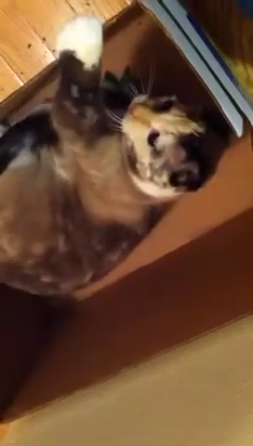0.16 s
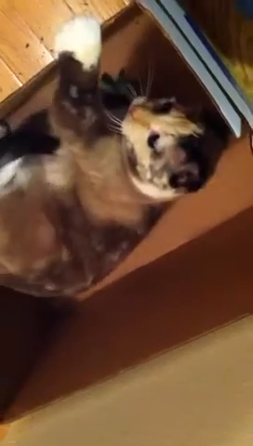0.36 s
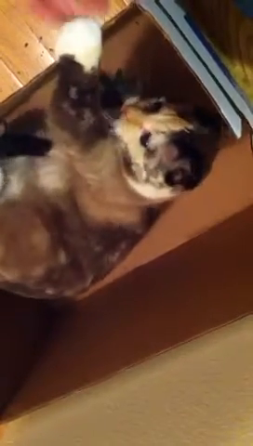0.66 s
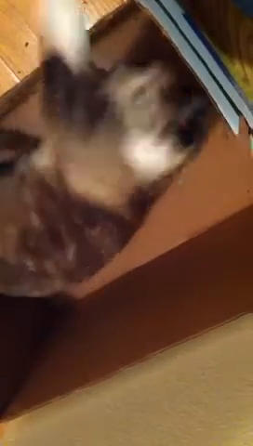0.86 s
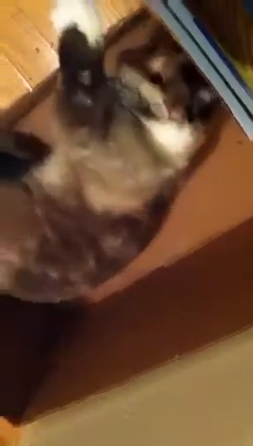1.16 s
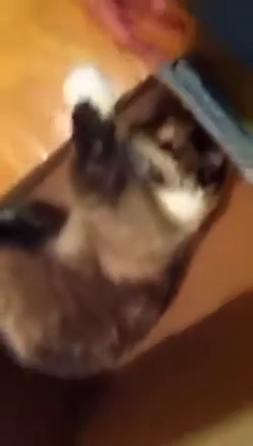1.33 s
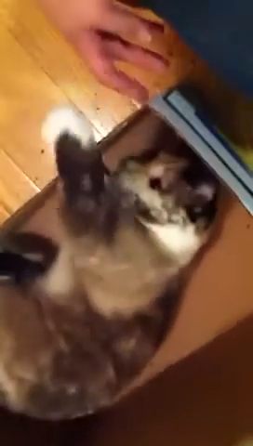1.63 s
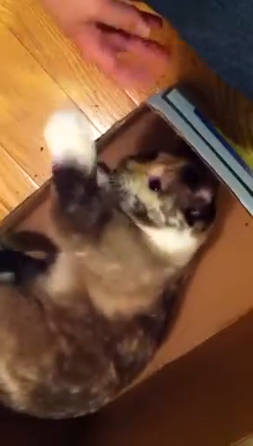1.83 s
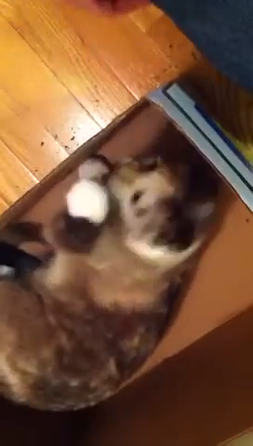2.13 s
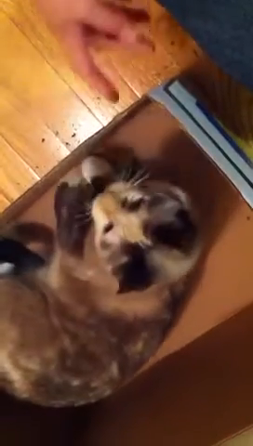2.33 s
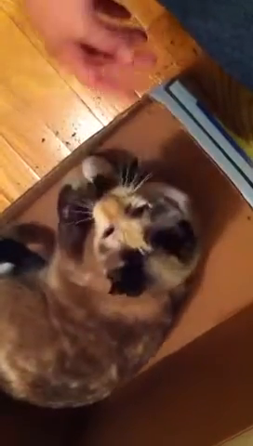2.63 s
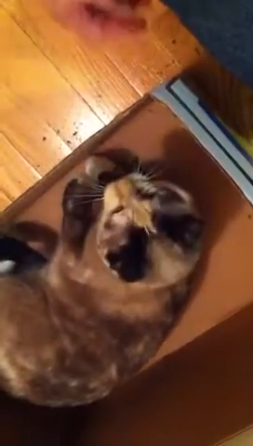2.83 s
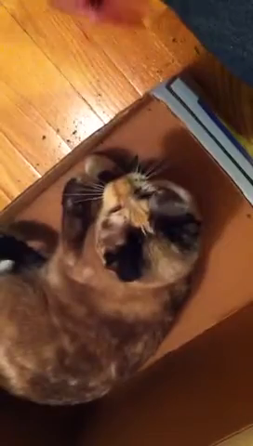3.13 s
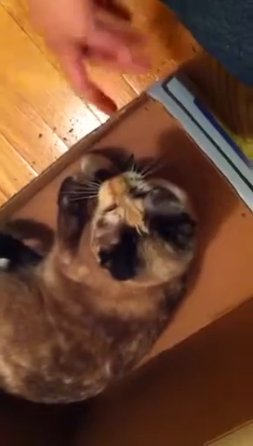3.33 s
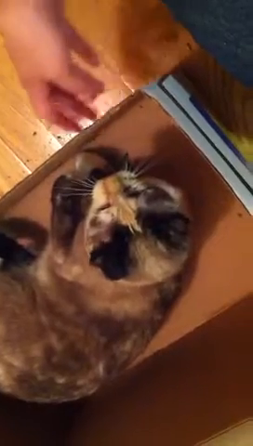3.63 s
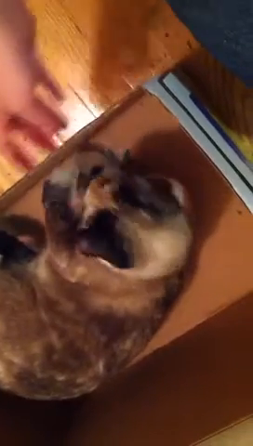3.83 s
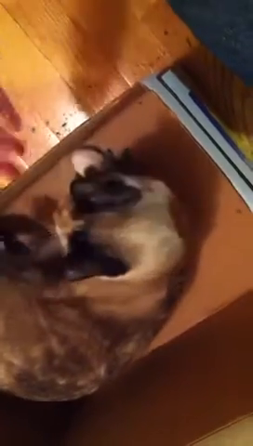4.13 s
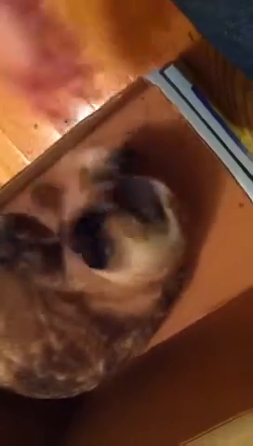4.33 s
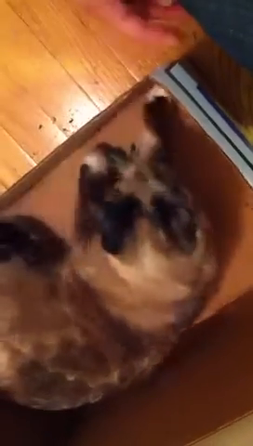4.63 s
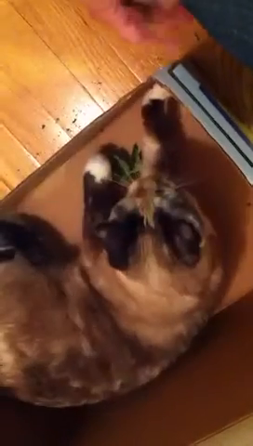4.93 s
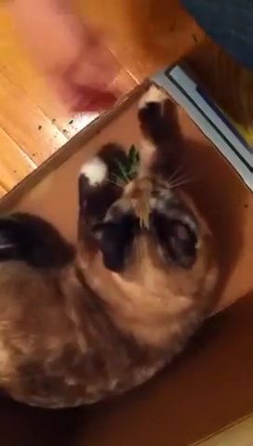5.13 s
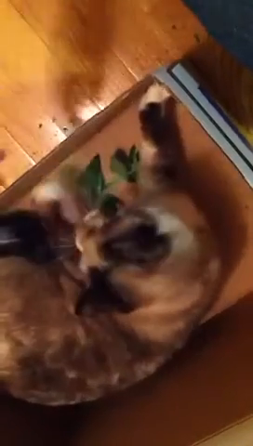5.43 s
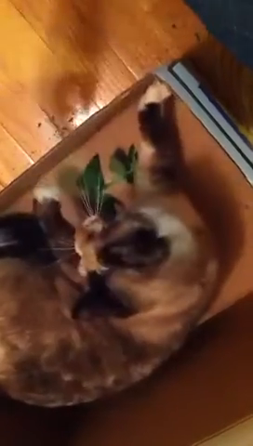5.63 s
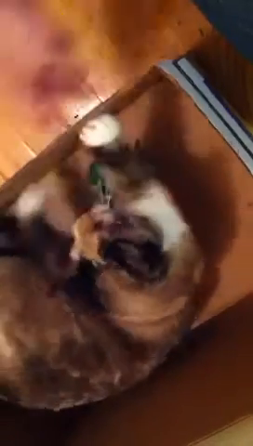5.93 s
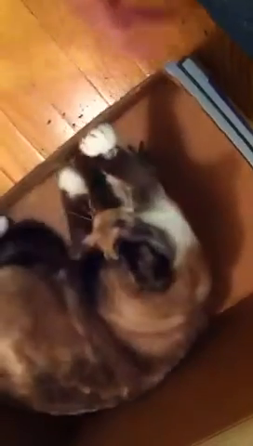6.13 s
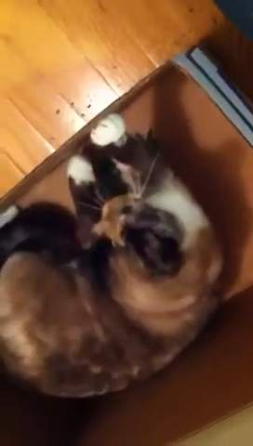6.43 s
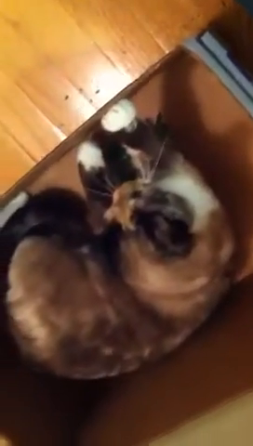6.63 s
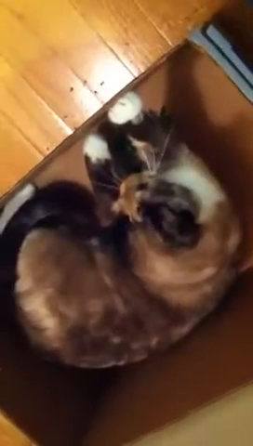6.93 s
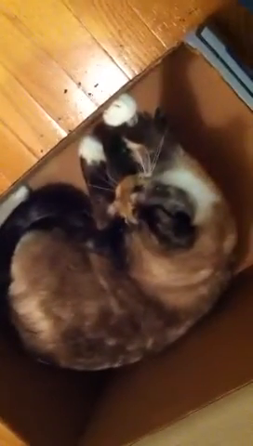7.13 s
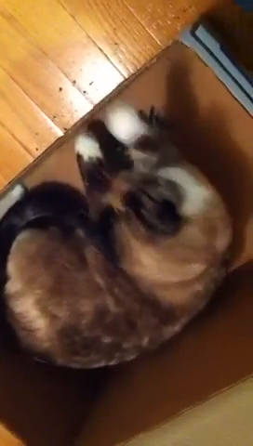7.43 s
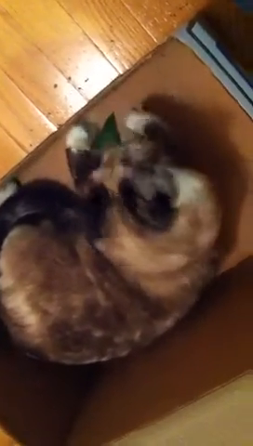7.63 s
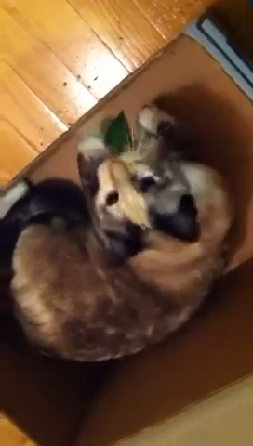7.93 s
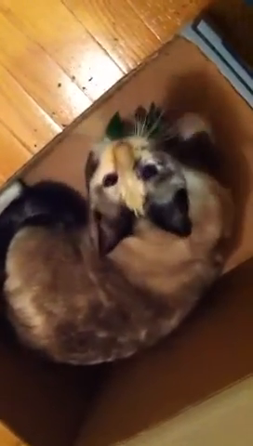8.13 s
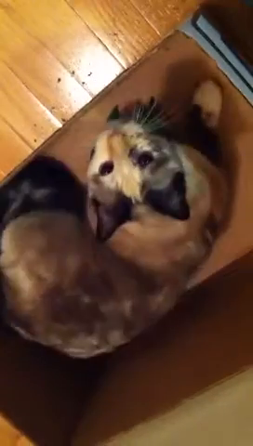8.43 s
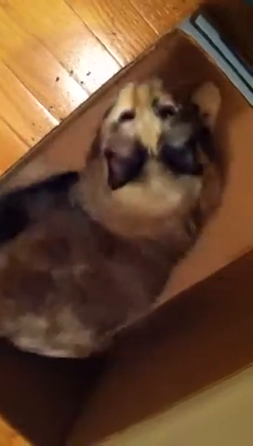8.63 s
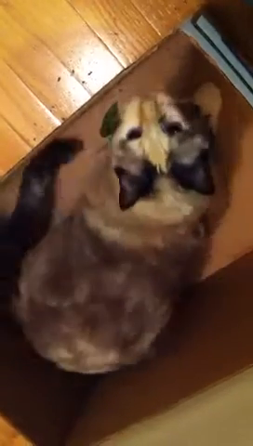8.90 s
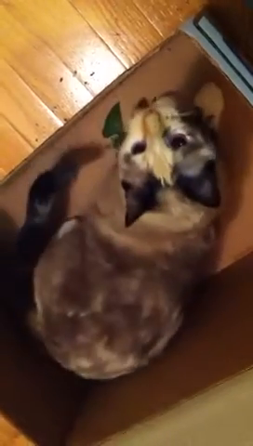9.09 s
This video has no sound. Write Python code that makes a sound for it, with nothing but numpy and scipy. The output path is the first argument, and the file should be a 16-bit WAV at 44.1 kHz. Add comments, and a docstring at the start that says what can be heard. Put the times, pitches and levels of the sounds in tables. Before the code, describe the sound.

Close cardboard knocks, short claw scrapes and soft body rubs come in bursts, busiest around four and six seconds, then fade into faint room murmur.

```python
"""First the low murmur and hiss of a quiet room; then a cat rolls about in an open cardboard box close by.
The box stands on a wooden floor. Paws and claws knock on its walls and skid a little: short pushes with a rattle.
Fur, claws and the sliding box rasp on the card: dense uneven slips that swell and fade; the card snaps a few times.
Knocks and rubs ring one box: a deep floor mode, the walls, the flaps and the stiff corrugated skin.
A faint echo of the room follows, heard through a microphone with a steep top cut."""
import sys
import numpy as np
from scipy import signal
from scipy.fft import rfft, irfft, next_fast_len
from scipy.io import wavfile

SR = 44100
rng = np.random.default_rng(int(sys.argv[2]) if len(sys.argv) > 2 else 0)


def dump(signal):
    """Clip the signal to [-1, 1] and save it as 16-bit WAV at the path in sys.argv[1]."""
    limited = np.clip(np.atleast_2d(signal).T, -1, 1)
    pcm = np.round(limited * 32767).astype(np.int16)
    wavfile.write(sys.argv[1], SR, pcm)


def voltage_ratio(level):
    """Linear amplitude factor for a level in decibels (scalar or array-like)."""
    return 10 ** (np.asarray(level, float) / 20)


N = 408366   # length in samples


def rms_one(x):
    """Scale to unit rms."""
    return x / np.sqrt(np.mean(x ** 2) + 1e-20)


def drift(rate_hz):
    """Slow chance of unit rms: noise twice through a one-pole low-pass, made at a twentieth of the rate."""
    r = np.exp(-40 * np.pi * rate_hz / SR)
    noise = rng.standard_normal(N // 20 + 2002)
    slow = signal.lfilter([1], [1, -2 * r, r * r], noise)[2000:]   # skip the filter's start
    return np.interp(np.arange(N) / 20, np.arange(len(slow)), rms_one(slow))


def coloured(x, spectrum):
    """Shape a signal by a (hz, level_db) spectrum; white noise of rms 1 keeps rms 1."""
    hz, level_db = np.transpose(spectrum)
    bins_hz = np.arange(1, N // 2 + 2) * SR / N
    gain = voltage_ratio(np.interp(np.log(bins_hz), np.log(hz), level_db, left=-90, right=-90))
    return irfft(rfft(x) * gain / np.sqrt(np.mean(gain ** 2)), N)


# air of the quiet room, spectrum shape: hz, level_db (per Hz, relative)
ROOM_TONE_SPECTRUM = [(40, -38), (70, -25), (100, -19.5), (150, -2.5), (200, -5), (310, -13), (480, -13.5),
                      (700, -20.5), (1200, -24), (3200, -24.5), (5000, -33), (6500, -31.5), (10000, -41.5),
                      (14000, -50), (15500, -62)]
ROOM_TONE_DB = -62.5   # rms around which the level drifts
WHINE_HZ, WHINE_RMS_DB = 14998, -94


def room_tone():
    """A low murmur of air with hiss on top, drifting slightly in level, and a very faint high sine whine."""
    air = coloured(rng.standard_normal(N), ROOM_TONE_SPECTRUM) * voltage_ratio(ROOM_TONE_DB + 1.2 * drift(2.1))
    whine = np.sqrt(2) * np.sin(2 * np.pi * WHINE_HZ * np.arange(N) / SR)
    return air + voltage_ratio(WHINE_RMS_DB) * whine


FLAPS_OVER_DB, FLAPS_SHARE = 0.5, 0.66   # flaps over a blend of skin (this share) and walls
FUR_UNDER_DB = -15   # fur hiss relative to the skin


def spread_over(skin_db, walls_db, extra_db, tilt_db=0):
    """Gains of skin, flaps, walls and fur for one rubbing contact, and its brightness weighted by the skin gain."""
    flaps_db = FLAPS_OVER_DB + extra_db + FLAPS_SHARE * skin_db + (1 - FLAPS_SHARE) * walls_db
    gains = voltage_ratio(np.array([skin_db, flaps_db, walls_db, skin_db + FUR_UNDER_DB]))
    return np.append(gains, voltage_ratio(skin_db) * tilt_db)[:, None]


CREST_DB = 9   # peak over rms of a short contact
RISE_SHARE = 0.4   # part of a short contact's length in which its pressure rises


def short_contacts(contacts):
    """Gains in time of short contacts: the pressure swells, holds and lets go."""
    out, t = np.zeros((5, N)), np.arange(SR // 2) / SR
    for start_s, gains, length_s in contacts:
        at = round(start_s * SR)
        rise = np.sin(np.pi / 2 * np.clip(t / (RISE_SHARE * length_s), 0, 1)) ** 2
        swell = rise * np.exp(-(t / length_s) ** 4)
        out[:, at:at + len(t)] += (voltage_ratio(-CREST_DB) * gains * swell)[:, :N - at]
    return out


# short scrapes of a paw on the card, drive levels relative within each part:
# start_s, skin_db, walls_db, length_s, extra_db (on the flaps), tilt_db (brightness, dB per octave)
PAW_SCUFFS = [(0.592, -44, -45, 0.028, 5, -3.5), (0.618, -48, -41.5, 0.035, 4, 4),
              (0.806, -55.5, -39.5, 0.057, 5.5, 4), (0.894, -58, -43, 0.093, 8.5, -9),
              (1.112, -59, -51.5, 0.093, 4, -1), (1.579, -36, -44.5, 0.052, 1, 0.5),
              (1.755, -50.5, -48.5, 0.093, -1, 2), (1.844, -46, -24.5, 0.016, 0, -9),
              (1.997, -45.5, -37, 0.064, 1.5, -4.5), (2.416, -39.5, -55, 0.027, 9.5, -4),
              (2.455, -38, -46, 0.024, 0, -2), (2.465, -61, -54, 0.04, 5, -2),
              (2.556, -38, -38, 0.059, 2, -2.5), (2.622, -62, -55, 0.093, 3, -6),
              (3.383, -47, -36.5, 0.033, 8.5, -3), (3.434, -45, -36, 0.04, 0.5, -3),
              (3.66, -47, -35, 0.027, -4, 3), (3.74, -45, -26.5, 0.02, -12, -4),
              (3.762, -41, -45, 0.017, 1, -7), (3.793, -55, -32, 0.017, -3, -13),
              (3.877, -39.5, -54, 0.05, 3, 7), (3.919, -40, -26.5, 0.038, -1, -3),
              (3.965, -51, -33, 0.029, -4, -10), (4.077, -42, -36, 0.02, -1.5, 0),
              (4.128, -48, -32, 0.029, -1, 12), (4.171, -45, -20.5, 0.014, -5.5, 9),
              (4.2, -36, -25, 0.016, 0.5, 14), (4.244, -32.5, -32, 0.026, -4, 11),
              (4.294, -34.5, -26, 0.021, -4, -3), (4.344, -42, -30, 0.028, 7, 5),
              (4.398, -34, -32.5, 0.026, 6.5, 3), (4.466, -26.5, -38, 0.012, 5.5, 2),
              (4.598, -46, -48, 0.012, 8, 8), (4.618, -48.5, -59, 0.039, 9.5, 11),
              (5.506, -54.5, -41, 0.074, 2.5, -1), (5.674, -42.5, -45, 0.06, 4, 3),
              (5.739, -33, -38.5, 0.026, 3, 7), (5.771, -32, -35, 0.023, -0.5, 2),
              (5.801, -26, -28, 0.024, -1.5, 10), (5.827, -48, -16, 0.022, -4, -4),
              (5.872, -25.5, -26, 0.022, -4.5, -2), (5.903, -26.5, -25.5, 0.015, -15, 10),
              (5.942, -22.5, -28, 0.038, -4, -1), (6.048, -28, -41, 0.039, 1.5, 0.5),
              (6.079, -27, -38, 0.025, 2.5, 5), (6.858, -57, -65, 0.1, 2.5, 3.5),
              (7.855, -64, -64, 0.077, 3, 4.5)]


def scuffs():
    """A paw skids briefly and drives skin, flaps, walls and fur together."""
    return short_contacts([(start_s, spread_over(skin_db, walls_db, extra_db, tilt_db), length_s)
                           for start_s, skin_db, walls_db, length_s, extra_db, tilt_db in PAW_SCUFFS])


# paws and claws on the box, drive levels relative within each part:
# start_s, skin_db, walls_db, floor_db, tick_db (claw), bright_db (brightness of the skin, dB per octave)
PAW_KNOCKS = [(0.593, -42.5, -34.5, -41, -50.5, -5), (0.722, -38, -52, -68, -38, -4),
              (0.821, -53, -45, -40, -48, -5), (0.897, -60, -38, -20.5, -67, -6),
              (0.9051, -37, -33.5, -25, -33, 1), (0.9369, -32, -22, -49, -37, 0),
              (1.2392, -52.5, -48.5, -49, -69.5, -20), (1.26, -76, -54, -56, -76, 2),
              (1.296, -76, -46, -37.5, -76, 7), (1.52, -44.5, -44, -44, -62.5, -1),
              (1.7554, -45.5, -42.5, -53, -55, 5), (1.8371, -38.5, -31, -42, -57, -8),
              (1.968, -69, -47.5, -36, -60, -11), (2.04, -25.5, -22, -13.5, -44.5, 23),
              (2.4225, -35.5, -46, -54, -47, -18), (2.5546, -33, -38, -67, -52, -5),
              (3.3131, -41, -34.5, -41.5, -61, 4), (3.5107, -52, -42.5, -46, -74, -7),
              (4.4603, -12, -45, -33.5, -33, 5), (4.4718, -30, -54, -40, -51, -12),
              (4.7917, -56, -71, -62, -84, -4), (4.855, -47.5, -74, -55, -71.5, -14),
              (4.9852, -51, -56, -55, -66, -9), (5.8398, -8, -26, -51, -24, 10),
              (6.1053, -34.5, -45, -48, -43, 13), (6.3112, -59, -46, -72, -80, -8),
              (7.5283, -44, -61, -62.5, -60, 9), (8.381, -47, -60, -49, -48.5, -10),
              (8.7931, -46, -76, -88, -56, 4)]


def blows(levels_db, soft_s, rattle_db, rattle_t60):
    """Every knock is a push that peaks after soft_s, with a brief rattle of the card behind it."""
    out, noise = np.zeros(N), rng.standard_normal(N)
    t = np.arange(SR // 10) / SR
    push = t / soft_s * np.exp(1 - t / soft_s) / (np.e * soft_s * SR)   # unit area
    for (start_s, *_), level_db in zip(PAW_KNOCKS, levels_db):
        at = round(start_s * SR)
        rattle = voltage_ratio(rattle_db - 60 * t / rattle_t60) * noise[at:at + len(t)]
        out[at:at + len(t)] += voltage_ratio(level_db) * (push + rattle)
    return out


# fur brushing the card lightly, drive levels relative within each part:
# start_s, fur_db, skin_db, length_s, tilt_db (brightness, dB per octave)
FUR_BRUSHES = [(0.737, -58, -52.5, 0.18, -5), (0.879, -54, -63, 0.12, 0), (5.004, -52, -60, 0.23, 9),
               (5.245, -53.5, -45.5, 0.19, 0), (7.364, -63.5, -57, 0.18, 3), (7.515, -55, -59, 0.052, 7),
               (8.017, -58, -51, 0.084, 15), (8.523, -61.5, -64.5, 0.11, 0), (8.635, -51.5, -51.5, 0.06, 1),
               (8.81, -75, -51.5, 0.057, 7), (9.079, -56.5, -77, 0.034, -2), (9.104, -65, -54.5, 0.12, 19)]


def brushes():
    """Fur touches only the skin of the card and hisses; walls and flaps stay out of it."""
    contacts = []
    for start_s, fur_db, skin_db, length_s, tilt_db in FUR_BRUSHES:
        skin = voltage_ratio(skin_db)
        gains = np.array([[skin], [0], [0], [voltage_ratio(fur_db)], [skin * tilt_db]])
        contacts.append((start_s, gains, length_s))
    return short_contacts(contacts)


# dry snaps of the card at the box itself: start_s, peak_db
CARD_SNAPS = [(1.2505, -43), (1.3135, -45), (1.353, -40), (8.013, -38)]
SNAP_LOW_HZ, SNAP_HIGH_HZ = 700, 4500


def snaps():
    """Single sharp clicks, band-passed so gently that they hardly ring."""
    out = np.zeros(N)
    for start_s, peak_db in CARD_SNAPS:
        out[round(start_s * SR)] = -voltage_ratio(peak_db)
    b, a = signal.butter(1, [SNAP_LOW_HZ, SNAP_HIGH_HZ], "band", fs=SR)
    return signal.lfilter(b, a, out + 1e-18) / b[0]


# long rubs of the body along the card, drive levels relative within each part:
# peak_s, skin_db, walls_db, swell_s, fade_s, extra_db (on the flaps)
BODY_RUBS = [(1.45, -64, -60, 0.05, 0.04, -3), (1.83, -73.5, -67, 0.12, 0.12, 8.5),
             (2.11, -68.5, -64, 0.19, 0.16, 2.5), (2.5, -74, -66, 0.041, 0.046, 3),
             (3.5, -87.5, -57.5, 0.12, 0.14, 1), (3.68, -57.5, -47, 0.11, 0.095, -4),
             (3.83, -53.5, -41, 0.072, .15, 0), (4.04, -63.5, -60, 0.052, 0.099, -3),
             (4.22, -57, -53, 0.085, 0.092, 2), (4.35, -51, -47, 0.15, 0.1, 0),
             (4.6, -55, -59, 0.19, 0.11, 2), (5.12, -51.5, -53, 0.063, 0.09, -3),
             (5.2, -71, -49.5, 0.044, 0.082, -8), (5.3, -53, -54, 0.043, 0.044, -11.5),
             (5.386, -56, -45, 0.067, 0.045, 5.5), (5.94, -43.5, -42.5, 0.17, 0.15, 0),
             (6.15, -68, -86, 0.068, 0.22, 0), (8.9, -70, -84, 0.063, 0.046, 6.5)]


def rubs():
    """The long rubs as gains in time: a bell that swells to its peak and fades."""
    out, t = np.zeros((5, N)), np.arange(N) / SR
    for peak_s, skin_db, walls_db, swell_s, fade_s, extra_db in BODY_RUBS:
        bell = np.exp(-((t - peak_s) / np.where(t < peak_s, swell_s, fade_s)) ** 2)
        out += spread_over(skin_db, walls_db, extra_db) * bell
    return out


def rasp(slips_per_s, size_db, smooth):
    """Dense uneven slips over the ribs of the card on top of a smooth slide."""
    sizes = voltage_ratio(size_db * np.minimum(rng.exponential(1, N), 5)) * rng.choice([-1, 1], N)
    slips = rms_one(sizes * (rng.random(N) < slips_per_s / SR))
    return rms_one(slips + smooth * rng.standard_normal(N))


def ring(x, hz, t60):
    """A unit click sets a sine of height 1 ringing, dying by 60 dB in t60 seconds."""
    r, w = voltage_ratio(-60 / (t60 * SR)), 2 * np.pi * hz / SR
    return signal.lfilter([0, np.sin(w)], [1, -2 * r * np.cos(w), r * r], x + 1e-18)


RUB_SHIFT_DB = 4   # how far each mode swells and fades as the contact moves


def body(modes, rubbing, knock_db, soft_s, rattle_db, rattle_t60, spread_db,
         tilt_db=0, rub_tilt_db=0, swell_t60=None):
    """One part of the box, rubbed and struck; each contact point favours other modes."""
    energy = sum(voltage_ratio(2 * level_db) * t60 * SR / (4 * np.log(1000)) for _, level_db, t60 in modes)
    chance = rng.standard_normal((len(PAW_KNOCKS), len(modes)))
    centre_hz = np.sqrt(modes[0][0] * modes[-1][0])
    out = np.zeros(N)
    for k, (hz, level_db, t60) in enumerate(modes):
        octaves = np.log2(hz / centre_hz)
        rub_gain = voltage_ratio(RUB_SHIFT_DB * drift(10.9) + rub_tilt_db * octaves)
        rubbed = rubbing * rub_gain / np.sqrt(energy)
        mode_db = knock_db + tilt_db * octaves + spread_db * chance[:, k]
        struck = blows(mode_db, soft_s, rattle_db, rattle_t60)
        if swell_t60:
            struck = ring(struck, hz, swell_t60) * 2 * np.log(1000) / (swell_t60 * SR)
        out += (-1) ** k * voltage_ratio(level_db) * ring(rubbed + struck, hz, t60)
    return out


# modes of the box, from its floor up to the corrugated skin: hz, level_db (relative within the part), t60_s
FLOOR_MODES = [(151.8, -8, 0.33), (169, -15.5, 0.069)]
WALL_MODES = [(200, -4, 0.027), (282, 1, 0.027), (309.3, 0, 0.058), (350, -1.5, 0.046), (413, 1, 0.047),
              (482, -10, 0.051)]
FLAP_MODES = [(570, -9, 0.039), (820.6, -5, 0.044), (910, -8, 0.088), (1070, 4.5, 0.016), (1288, 5, 0.015),
              (1613, 2.5, 0.013)]
SKIN_MODES = [(1986, 2.5, 0.013), (2220, 3.5, 0.01), (2870, 5.5, 0.0062), (3220, -2, 0.012),
              (3605, -1.5, 0.01), (4120, -4.5, 0.0077), (4650, -14, 0.0076)]
# hiss of fur and claws on the card, spectrum shape: hz, level_db (per Hz, relative)
FUR_SPECTRUM = [(2590, -20), (4400, -11), (4800, -10.5), (7780, -10.5), (9800, -23), (13600, -28.5),
                (15000, -54)]
# the flaps lie between skin and walls and take less from a sharp claw than from a pad
KNOCK_FLAPS_DB, FLAPS_LOSS_PER_CLAW_DB = -17.5, 1.15
KNOCK_TILT_DB_PER_OCTAVE = -5.5   # a knock favours the low wall modes, a rub the high ones
FLOOR_SWELL_T60_S = 0.04   # the floor takes a few cycles to get going


def box():
    """Floor, walls, flaps, skin and the bright hiss of fur and claws; little is radiated below the floor mode."""
    pressure = voltage_ratio(1.8 * drift(40.0))   # the contact presses in small lumps
    long, short = rubs(), scuffs() + brushes()
    skin, flaps, walls, fur = np.hypot(long, short)[:4] * pressure
    rub_bright_db = short[4] / (long[0] + short[0] + 1e-9)   # the strongest contact sets the colour
    _, skin_db, walls_db, floor_db, tick_db, bright_db = np.transpose(PAW_KNOCKS)
    claw_db = tick_db - skin_db
    flaps_db = (skin_db + walls_db) / 2 + KNOCK_FLAPS_DB - FLAPS_LOSS_PER_CLAW_DB * claw_db
    slide = rasp(2000.0, size_db=3.0, smooth=1.3)
    brush = rasp(6000.0, size_db=3.5, smooth=0.6)
    # a push couples into each part with its own strength: the offsets on the knock levels
    floor_sound = body(FLOOR_MODES, walls * slide * voltage_ratio(-19.5), floor_db + 5.0, soft_s=0.00069,
                       rattle_db=-25.5, rattle_t60=0.026, spread_db=0, swell_t60=FLOOR_SWELL_T60_S)
    wall_sound = body(WALL_MODES, walls * slide, walls_db - 1.5, soft_s=0.00044,
                      rattle_db=-17.0, rattle_t60=0.018, spread_db=2.5,
                      tilt_db=KNOCK_TILT_DB_PER_OCTAVE, rub_tilt_db=1.0)
    flap_sound = body(FLAP_MODES, flaps * slide, flaps_db - 13, soft_s=0.00006,
                      rattle_db=-23.5, rattle_t60=0.043, spread_db=7.0,
                      tilt_db=-1.5, rub_tilt_db=rub_bright_db)
    skin_sound = body(SKIN_MODES, skin * slide, skin_db - 14.0, soft_s=0.00003,
                      rattle_db=-17.0, rattle_t60=0.025, spread_db=-4.0,
                      tilt_db=bright_db, rub_tilt_db=rub_bright_db)
    ticks = blows(tick_db + 9.0, soft_s=0.00002, rattle_db=-13.0, rattle_t60=0.016)
    hiss = coloured(fur * brush + ticks, FUR_SPECTRUM)
    radiation = signal.butter(7, 128.0, "high", fs=SR, output="sos")
    return signal.sosfilt(radiation, floor_sound + wall_sound + flap_sound + skin_sound + hiss)


ROOM_T60_S, ROOM_DB, WALL_CUT_HZ = 0.34, -20.5, 14000


def room(x):
    """Eighteen feedback delays of 7 to 37 ms, duller on every round."""
    size = next_fast_len(N + SR)
    turn = np.exp(-2j * np.pi * np.arange(size // 2 + 1) / size)   # a delay of one sample
    dull = np.exp(-2 * np.pi * WALL_CUT_HZ / SR)
    low_pass = (1 - dull) / (1 - dull * turn)
    tail = 0
    for k, lag in enumerate((rng.uniform(0.007, 0.037, size=18) * SR).astype(int)):
        loop = voltage_ratio(-60 * lag / SR / ROOM_T60_S) * low_pass * np.exp(lag * np.log(turn))
        tail = tail + (-1) ** k * loop / (1 - loop)
    return irfft(rfft(x, size) * tail, size)[:N]


def scene():
    """The box close by, its echo in the room, the room's own tone."""
    near = box() + snaps()
    return (near + voltage_ratio(ROOM_DB) * room(near) + room_tone())[None]


def roll_off(x):
    """The treble ends steeply here."""
    return signal.sosfilt(signal.butter(12, 15280, fs=SR, output="sos"), x)


MIC_TOP_HZ = 16300   # from here up the microphone is 50 dB down


def record(dry):
    """One microphone near the box; a steep low-pass cuts the top of its band."""
    top_cut = signal.cheby2(10, 50, MIC_TOP_HZ, fs=SR, output="sos")
    mix = signal.sosfilt(top_cut, dry)
    return roll_off(mix)


dry = scene()
out = record(dry)
dump(out)
```